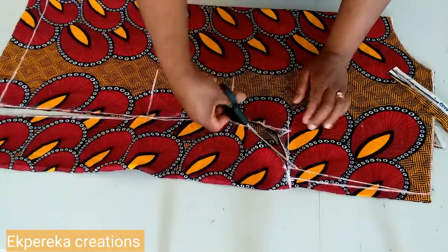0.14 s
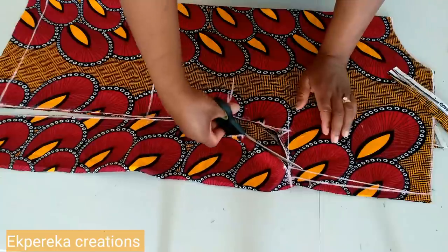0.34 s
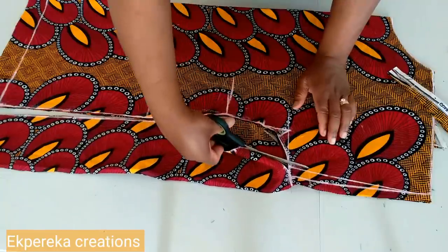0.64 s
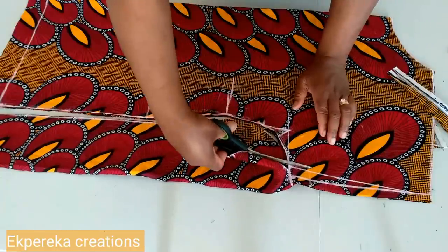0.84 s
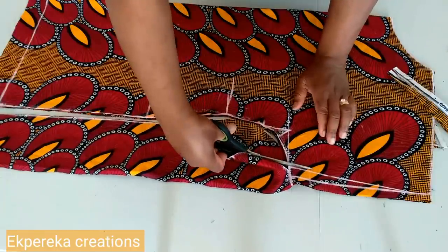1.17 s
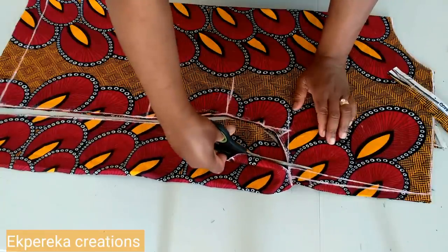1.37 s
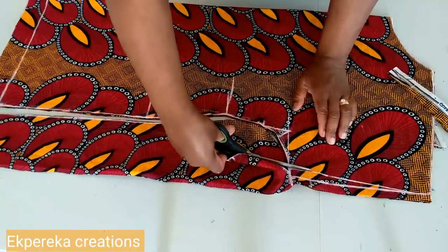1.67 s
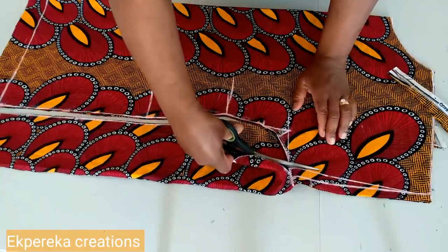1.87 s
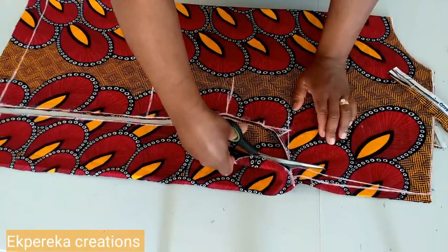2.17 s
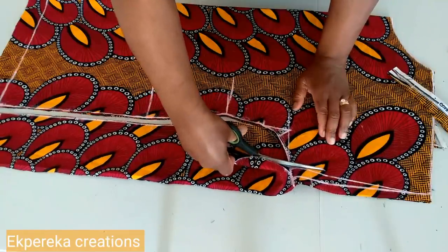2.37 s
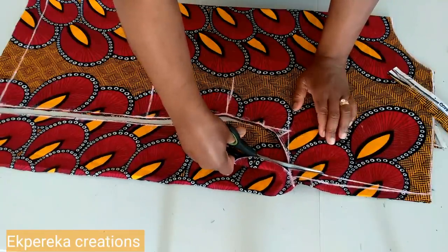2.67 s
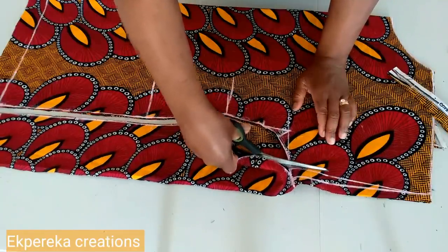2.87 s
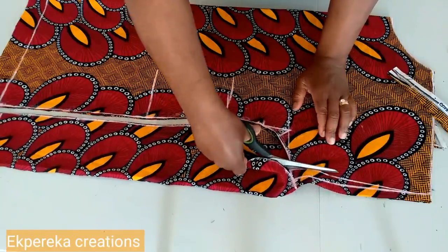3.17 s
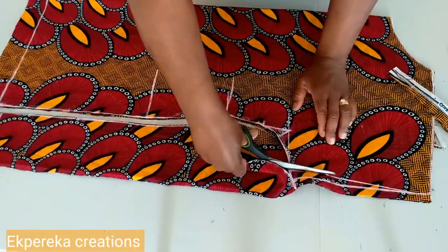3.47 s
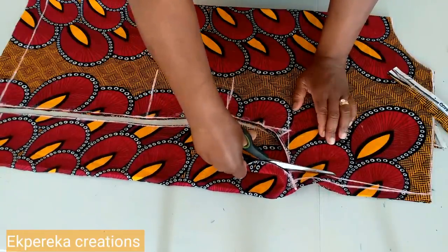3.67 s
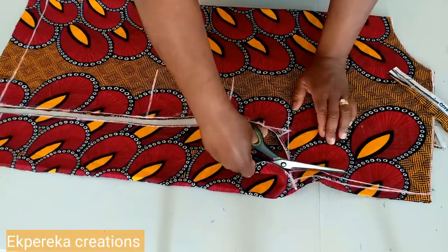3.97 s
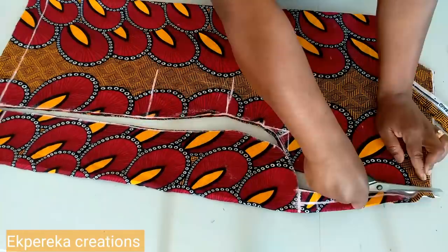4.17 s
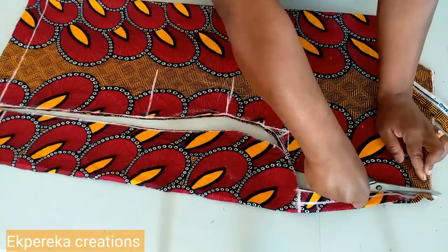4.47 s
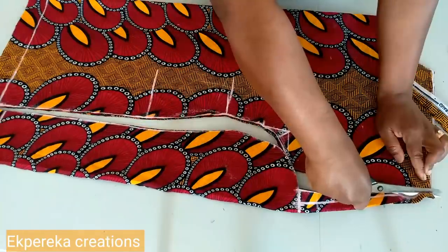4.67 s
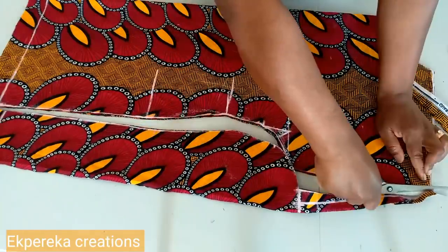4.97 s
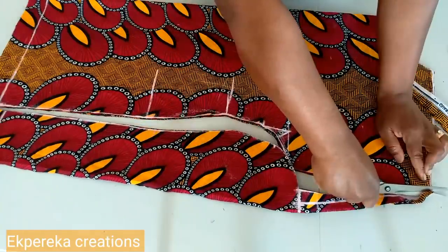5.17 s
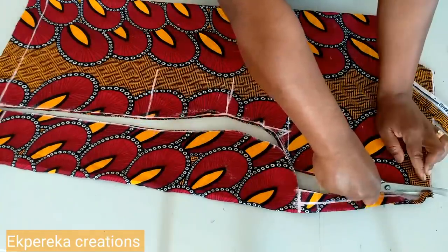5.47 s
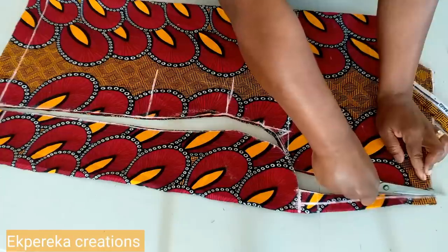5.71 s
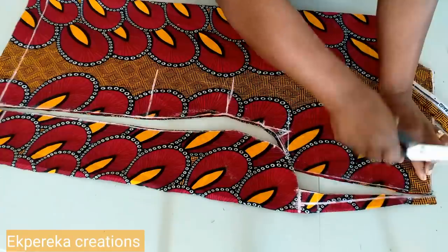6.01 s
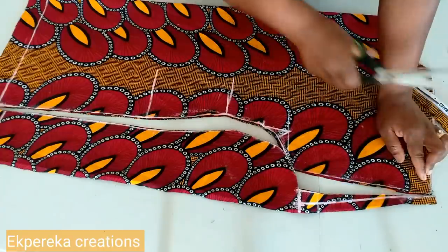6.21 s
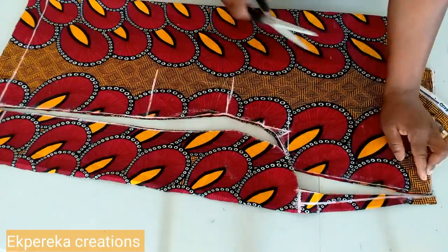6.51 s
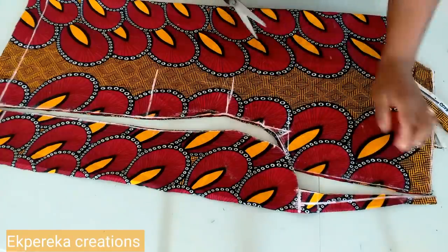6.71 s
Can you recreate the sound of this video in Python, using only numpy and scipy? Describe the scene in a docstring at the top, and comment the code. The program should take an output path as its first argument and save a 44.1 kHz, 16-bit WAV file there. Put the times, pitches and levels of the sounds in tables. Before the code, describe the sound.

Five unhurried scissor cuts through fabric, crunchy and clacking against a tabletop, ending with a sharp snap and a soft cloth rustle.

```python
"""Tailor's shears cut cotton cloth on a table in a small bare room: five cuts, the last snapping shut.
Threads part between the closing blades as a train of impulses, heard as a crunch; the blades catch
and jump, exciting the resonances of the shears and, through the lower blade, those of the table.
Between cuts the shears reopen with a thin stick-slip scrape, touch down softly and slide on.
Cloth hisses under hand and blade, a hand presses on it once, and the room rumbles steadily."""
import sys
import numpy as np
from scipy import signal
from scipy.fft import rfft, irfft, next_fast_len
from scipy.io import wavfile
from scipy.ndimage import map_coordinates

SR = 44100
rng = np.random.default_rng(int(sys.argv[2]) if len(sys.argv) > 2 else 0)


def dump_mix(stems):
    """Bounce the given channels to the path in sys.argv[1] as a 16-bit WAV at rate SR."""
    frames = np.atleast_2d(stems).T  # one column per channel
    limited = np.clip(frames, -1, 1)  # hard clip at full scale
    pcm = np.round(limited * 32767).astype(np.int16)
    wavfile.write(sys.argv[1], SR, pcm)


N = 302085
T = np.arange(int(SR * .7)) / SR  # time within one event, t/s


def amp(db):
    """Amplitude ratio of a level in decibels."""
    return 10 ** (np.asarray(db) / 20)


def unit(x):
    """Normalisation to rms 1."""
    return x / np.sqrt(np.mean(np.abs(x) ** 2) + 1e-20)


def unit_onset(x):
    """Normalisation to rms 1 over the first 20 ms."""
    return x / np.sqrt(np.mean(x[:int(.02 * SR)] ** 2) + 1e-20)


def along(points, hz):
    """Interpolation of (f/Hz, value) points on a logarithmic frequency axis."""
    f, values = np.transpose(points)
    return np.interp(np.log(hz + 1), np.log(f), values)


def add(track, start, sound):
    """Superposition of a sound on a track, from start/s onward."""
    part = track[max(round(start * SR), 0):][:len(sound)]
    part += sound[:len(part)]


def colour(x, spectrum):
    """Minimum-phase filtering to a given spectral shape, at unit power gain."""
    size = 2 * next_fast_len(len(x) // 2 + 4096)
    gain = unit(amp(along(spectrum, np.fft.rfftfreq(size, 1 / SR))))
    cepstrum = irfft(np.log(gain + 1e-6))
    cepstrum[1:size // 2] *= 2  # folding the cepstrum makes the filter causal
    cepstrum[size // 2 + 1:] = 0
    return irfft(rfft(x, size) * np.exp(rfft(cepstrum)))[:len(x)]


def resonate(x, modes):
    """Forced response of damped modes (f/Hz, bandwidth/Hz, level/dB), at unit power gain."""
    f = np.fft.rfftfreq(len(x), 1 / SR)
    response = sum((-1) ** k * amp(db) * 1j * f * width / (hz * hz - f * f + 1j * f * width)
                   for k, (hz, width, db) in enumerate(modes))
    return irfft(rfft(x) * unit(response), len(x))


def emphasise(x, hz, width_hz, boost_db):
    """Selective excitation: the place where the edges meet favours one resonance."""
    b, a = signal.iirpeak(hz, hz / width_hz, fs=SR)
    return x + amp(boost_db) * signal.lfilter(b, a, x)


def snaps(size, per_s, spread_db):
    """Shot noise: impulses at random moments, of very unequal force, over a faint hiss."""
    impulses = (rng.random(size) < per_s / SR) * rng.standard_normal(size)
    force = amp(spread_db * rng.standard_normal(size))
    return unit(impulses * force + 0.027 * rng.standard_normal(size))


# reverberation time of the room: (f/Hz, T60/s)
ROOM_DECAY = [(100, 0.32), (500, 0.35), (3000, 0.37), (6000, 0.38), (11000, 0.28), (16000, 0.22)]
def in_room(x, wet_db):
    """Reverberation: direct sound, five early reflections and a tail whose top treble dies first."""
    hz, t, noise = signal.stft(rng.standard_normal(len(T)), SR, nperseg=256)
    decay = amp(-60 * t / along(ROOM_DECAY, hz)[:, None])
    tail = signal.istft(noise * decay, SR, nperseg=256)[1][:len(T)]
    tail *= 1 - np.exp(-T / 0.0009)
    response = amp(wet_db) * tail / np.linalg.norm(tail)
    response[0] += 1
    reflections = (rng.uniform(.0006, .009, 5) * SR).astype(int)
    response[reflections] += 0.27 * rng.choice([-1, 1], 5)
    return signal.fftconvolve(x, response / np.linalg.norm(response))[:len(T)]


# spectrum of the room's background: (f/Hz, relative level/dB)
RUMBLE_SPECTRUM = [(12, -73.5), (20, -26.5), (44, -12.5), (76, -11.5), (153, -1.5), (176, -15), (232, -0.5),
                   (267, -7.5), (466, -18), (536, -26.5), (599, -21.5), (708, -28.5), (910, -29.5),
                   (6400, -45), (15600, -39.5)]
def rumble():
    """Stationary noise: the low, steady rumble of the room."""
    return amp(-61.5) * unit(colour(rng.standard_normal(N), RUMBLE_SPECTRUM))


# spectrum of sliding cotton: (f/Hz, relative level/dB)
CLOTH_SPECTRUM = [(300, -30.5), (600, 2), (800, -6), (1050, -1), (1500, -5), (4500, 1), (6000, -4.5),
                  (8300, -4.5), (9300, -15.5), (12500, -14.5), (15500, -20.5)]
# cloth slides under hand and blade: (start t/s, time until fading/s, level/dB)
CLOTH_SLIDES = [(-.05, .1, -73.5), (0.12, 0.091, -68.5), (.5, 0.24, -74.5), (1.72, 0.23, -76.5),
                (2.78, 0.23, -68), (3.723, 0.082, -69.5), (4.158, 0.045, -75.5), (4.705, 0.13, -77),
                (6.171, 0.21, -60), (6.501, .1, -72.5), (6.77, .08, -72)]
def sliding(rise_s=0.076, fade_db_per_s=46.5, rest_db=-85):
    """Friction noise of cotton fibres: the slides swell, hold and fade, and add in power."""
    t = np.arange(N) / SR
    power = amp(rest_db) ** 2
    for start, hold, db in CLOTH_SLIDES:
        rise = np.clip((t - start) / rise_s, 0, 1)
        fade_db = fade_db_per_s * np.maximum(t - start - hold, 0)
        power = power + (rise * amp(db - fade_db)) ** 2
    fibres = snaps(N, per_s=9000, spread_db=2)
    return np.sqrt(power) * colour(fibres, CLOTH_SPECTRUM)


def pat(start_s=6.252, rise_s=0.0088, t60_s=0.18):
    """Cushioned impact: a hand presses on the cloth, a soft, deep push with no ring."""
    out = np.zeros(N)
    spectrum = [(20, -25), (50, -5), (85, 0), (130, -4), (250, -21), (1000, -72)]  # (f/Hz, level/dB)
    push = unit(colour(rng.standard_normal(len(T)), spectrum))
    add(out, start_s, amp(-44) * push * (1 - np.exp(-T / rise_s)) * amp(-60 * T / t60_s))
    return out


# table-top modes left ringing by a firm push: (f/Hz, relative level/dB, T60/s)
BOOM_MODES = [(142.2, 7.5, 0.48), (148, -3, 0.11), (110, -14.5, 0.12), (194.3, -1.5, 0.31),
              (310, -14.5, 0.16), (383, -12.5, 0.093)]
def table_boom(rise_s):
    """Free vibration of the table top, which radiates little below its lowest mode."""
    modes = sum(amp(db - 60 * T / t60) * np.sin(2 * np.pi * hz * T) for hz, db, t60 in BOOM_MODES)
    highpass = signal.butter(2, 88, "high", fs=SR, output="sos")
    return signal.sosfilt(highpass, modes * (1 - np.exp(-T / max(rise_s, .001))))


# damped resonances of the table top: (f/Hz, bandwidth/Hz, relative level/dB)
THUMP_MODES = [(198.5, 42.5, -6), (246, 24.8, 1.5), (313, 58, -2.5), (374.2, 43.5, -0.5)]
def table_thump(force):
    """Forced vibration: the table top answers each jolt of the lower blade."""
    return resonate(force, THUMP_MODES)


# modes of the steel blades: (f/Hz, bandwidth/Hz, relative level/dB)
BLADE_MODES = [(2605, 70, -5.5), (3003, 80, 0.5), (3730, 70, -3.5), (4637, 66, 2), (5255, 49, -2),
               (6560, 120, 2), (8170, 99, -3), (12100, 150, 6)]
def ringing(friction, ring_db):
    """Resonance: friction plus the ring that it draws from the blades, at rms 1."""
    return unit(unit(friction) + amp(ring_db) * unit(resonate(friction, BLADE_MODES)))


# blade rubs on blade while reopening: (start t/s, duration/s, initial f/Hz, level/dB)
BLADE_SCRAPES = [(0.021, .23, 4600, -75), (1.271, .15, 3400, -70.5), (2.956, 0.48, 5200, -70),
                 (3.775, 0.16, 4200, -77), (4.183, 0.072, 4500, -74), (4.305, 0.012, 4400, -50),
                 (5.081, .18, 4680, -74)]
def scrapes(width_hz=410, sag_octaves_per_s=1.4):
    """Stick-slip friction: its pitch sinks through the blade modes as the crossing point travels."""
    out = np.zeros(N)
    slowing_index = np.cumsum(2 ** (-sag_octaves_per_s * T))
    for start, length, hz, db in BLADE_SCRAPES:
        pressure = np.sqrt(np.abs(np.sin(np.pi * np.minimum(T / length, 1))))
        slips = resonate(snaps(len(T), per_s=5500, spread_db=5.5), [(hz, width_hz, 0)])
        steel = ringing(pressure * map_coordinates(slips, [slowing_index]), ring_db=-1.5)
        add(out, start, amp(db) * np.sqrt(np.mean(pressure ** 2)) * in_room(steel, wet_db=0.5))
    return out


# modes of the shears pressed on the table: (f/Hz, bandwidth/Hz, relative level/dB)
SHEARS_MODES = [(528, 62, -4.5), (644, 32, 2), (741, 40, -2.5), (857.4, 70, -1), (954, 95, -3.5),
                (1067, 160, -5.5), (1482, 140, -7), (1706, 580, -12.5)]
def shears_clack(force, hz, width_hz, boost_db):
    """Modal response of the jolted shears, lifted around one frequency."""
    return emphasise(resonate(force, SHEARS_MODES), hz, width_hz, boost_db)


# spectrum of the steel edges' ticks: (f/Hz, relative level/dB)
TICK_SPECTRUM = [(1500, -30), (5000, 3.5), (8200, 4), (9300, -4), (11500, 1), (12700, -0.5), (13800, -6),
                 (15500, -1.5)]
def edge_tick(force):
    """Hard contact: brief impulses on the edges carry mostly treble."""
    return colour(force, TICK_SPECTRUM)


# spectrum of cloth shearing between the blades: (f/Hz, relative level/dB)
RASP_SPECTRUM = [(300, -25.5), (1200, -5.5), (1900, -3.5), (2200, -6.5), (2550, -1.5), (3300, -0.5),
                 (4600, -5), (5400, -9.5), (6200, -12), (8300, -17), (9300, -24), (15500, -28.5)]
def cloth_rasp(force):
    """Broadband excitation: shearing cloth rasps and sets the blades ringing."""
    return ringing(colour(force, RASP_SPECTRUM), ring_db=-7)


def burst(length):
    """Transient shot noise: a short volley leads with a hard catch, a long one swells gently."""
    length = np.clip(length, .001, .05)
    envelope = (1 - np.exp(-T / (0.27 * length))) * np.exp(-T / length)
    volley = snaps(len(T), per_s=6000, spread_db=3) * envelope
    volley /= np.linalg.norm(volley)
    volley[int(.55 * length * SR)] += 1.54 * np.exp(-length / .005)  # the catch
    return volley


def contact(length, rasp_db, tick_db, clack_db, clack_hz, table_db):
    """Impact on coupled bodies: cloth rasps, edges tick, shears clack, the table thumps and booms."""
    volley = burst(length)
    rasp = in_room(cloth_rasp(volley), wet_db=4)
    tick = in_room(edge_tick(burst(length)), wet_db=1.5)
    clack = in_room(shears_clack(volley, clack_hz, width_hz=91, boost_db=7), wet_db=-2)
    thump = in_room(table_thump(volley), wet_db=-1)
    hard_push_db = -32.5  # above this the whole top rings, and the boom outgrows the thump
    boom_db = table_db - 9.5 + 0.71 * max(table_db - hard_push_db, 0)
    parts = [(rasp_db, rasp), (tick_db, tick), (clack_db, clack),
             (table_db, thump), (boom_db, table_boom(length))]
    return sum(amp(db) * unit_onset(part) for db, part in parts)


# the shears shift and rest:
# (t/s, time constant/s, rasp level/dB, clack level/dB, clack f/Hz, table level/dB)
SOFT_TOUCHES = [(0.94, 0.017, -96, -74, 850, -69), (1.268, .012, -65.5, -66, 600, -79),
                (1.745, 0.0086, -70, -55, 850, -57.5), (1.832, 0.029, -81, -67.5, 850, -63),
                (2.318, 0.0096, -94, -76, 650, -61), (2.389, 0.017, -63.5, -65, 850, -85),
                (2.513, .012, -56, -63, 860, -78), (2.884, 0.037, -72, -57.5, 826, -58),
                (3.427, 0.011, -58, -73, 900, -65), (3.794, 0.028, -82, -68, 560, -66.5),
                (4.312, 0.0063, -66, -64, 1680, -57), (4.725, 0.025, -72, -52, 650, -48.5),
                (4.823, 0.017, -88, -64, 640, -47), (5.091, .014, -85, -73.5, 603, -50.5),
                (5.31, 0.0068, -64.5, -70.5, 637, -67.5), (5.829, 0.027, -61, -54, 640, -53.5),
                (6.609, 0.027, -71, -72, 640, -72), (6.825, 0.013, -78, -70, 627, -79)]
def touches():
    """Cushioned impacts: the cloth makes the contacts between cuts slow and soft."""
    out = np.zeros(N)
    for start, length, rasp_db, clack_db, clack_hz, table_db in SOFT_TOUCHES:
        tick_db = rasp_db - 15.5
        add(out, start, contact(length, rasp_db, tick_db, clack_db, clack_hz, table_db))
    return out


# closing strokes, one or two to a cut, each at its own place along the blades:
# (start t/s, end t/s, rasp level/dB, rasp f/Hz, clack f/Hz)
CLOSING_STROKES = [(1.463, 1.53, -47.5, 3300, 1214), (2.593, 2.713, -48.5, 4260, 1160),
                   (2.756, 2.8, -51.5, 5730, 877), (3.524, 3.618, -43, 4800, 957),
                   (4.337, 4.443, -55.5, 3000, 660), (4.484, 4.57, -46, 6060, 1630),
                   (5.328, 5.448, -54.5, 4440, 900), (5.605, 5.671, -32, 2990, 1414)]
def crunch():
    """Progressive fracture: while the blades close, the weave gives way thread by thread."""
    out = np.zeros(N)
    for start, end, level_db, rasp_hz, clack_hz in CLOSING_STROKES:
        threads = snaps(len(T), per_s=350, spread_db=2) * (T < end - start)
        shearing = emphasise(colour(threads, RASP_SPECTRUM), rasp_hz, width_hz=1100, boost_db=10.5)
        rasp = ringing(shearing, ring_db=-7)
        clack = shears_clack(threads, clack_hz, width_hz=99, boost_db=1)
        parts = [(0, rasp), (-12, edge_tick(threads)), (-1.5, clack), (1, table_thump(threads))]
        # each part scales with the snaps that drive it, at its level/dB relative to the rasp
        sound = threads.std() * sum(amp(level_db + db) * unit(part) for db, part in parts)
        add(out, start, in_room(sound, wet_db=-4.5))
    return out


# the blades bite through a bunch of threads:
# (t/s, rasp level/dB, tick level/dB, clack level/dB, table level/dB)
THREAD_BITES = [(1.453, -44.5, -61, -35.5, -48), (1.467, -43.5, -55, -39, -44.5),
                (1.491, -42.5, -46.5, -39.5, -46), (1.5331, -50, -51.5, -35.5, -41),
                (1.566, -47.5, -53.5, -41, -44), (2.55, -47.5, -59, -47.5, -57),
                (2.588, -44.5, -52.5, -39.5, -43), (2.615, -42.5, -50.5, -41.5, -40.5),
                (2.646, -41, -51, -34.5, -66), (2.675, -43, -46.5, -48, -55),
                (2.75, -44.5, -53, -40, -42.5), (3.439, -53, -55, -62, -65), (3.463, -51.5, -62, -54, -61),
                (3.478, -41, -49.5, -38, -51.5), (3.519, -40, -48, -32.5, -40.5),
                (3.542, -37.5, -45.5, -33.5, -35), (3.566, -38.5, -57, -39.5, -40),
                (4.332, -50, -61.5, -52.5, -43.5), (4.379, -46, -61, -57, -48.5),
                (4.396, -52, -58.5, -54.5, -58), (4.4797, -41, -53.5, -34.5, -28),
                (4.531, -44, -49.5, -37, -41), (5.323, -53, -60, -52, -46.5), (5.395, -56, -57, -61, -49),
                (5.438, -57, -67.5, -72, -54.5), (5.5987, -39.5, -44, -45.5, -30),
                (5.603, -24, -33.5, -20.5, -17), (5.63, -32, -36, -29, -32.5)]
def bites(parting_s=.0036):
    """Impulsive release: the blades catch and jump, ringing at the pitch of the nearest stroke."""
    out = np.zeros(N)
    for t, rasp_db, tick_db, clack_db, table_db in THREAD_BITES:
        *_, clack_hz = min(CLOSING_STROKES, key=lambda stroke: abs((stroke[0] + stroke[1]) / 2 - t))
        add(out, t, contact(parting_s, rasp_db, tick_db, clack_db, clack_hz, table_db))
    return out


def scene():
    """Superposition: the cutting and handling add to the room's rumble in one channel."""
    return (rumble() + bites() + crunch() + touches() + scrapes() + sliding() + pat())[None]


def record(dry, top_hz=15700):
    """Band limiting: an ideal low-pass filter removes the highest treble."""
    size = next_fast_len(N + SR)
    passband = np.fft.rfftfreq(size, 1 / SR) < top_hz
    return irfft(rfft(dry, size) * passband, size)[:, :N]


dry = scene()
out = record(dry)
dump_mix(out)
```